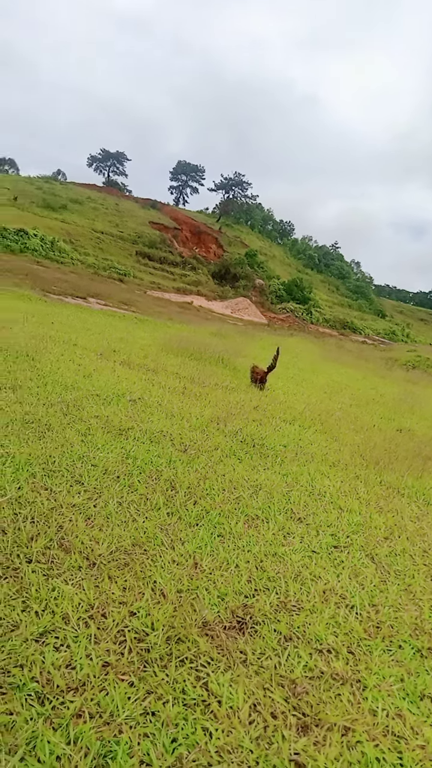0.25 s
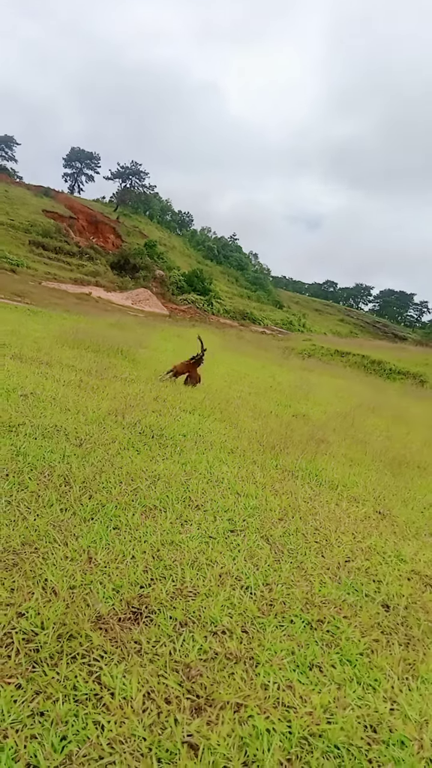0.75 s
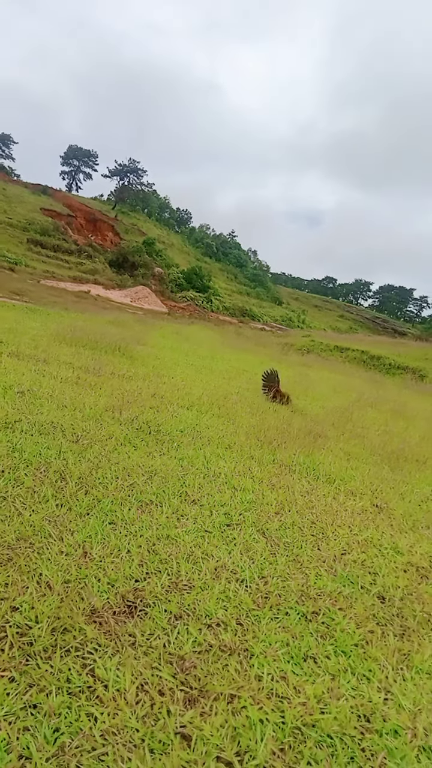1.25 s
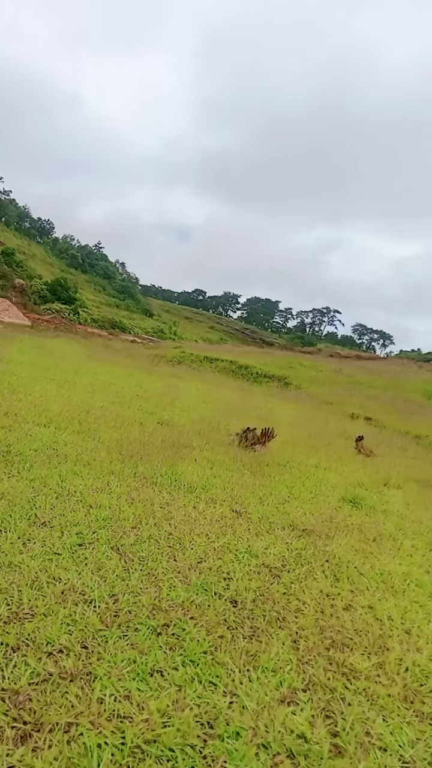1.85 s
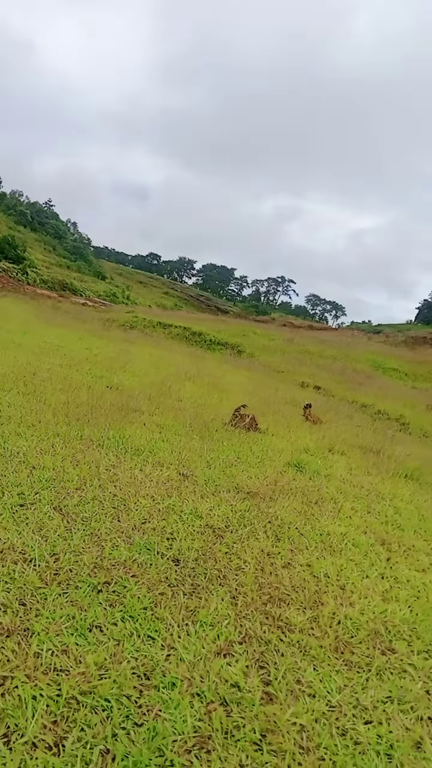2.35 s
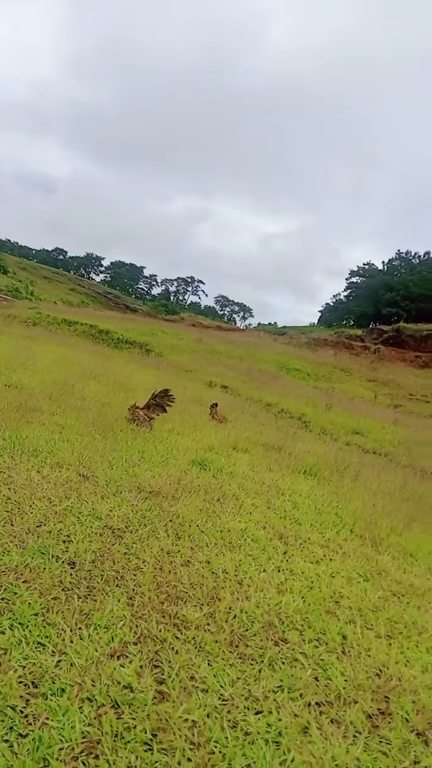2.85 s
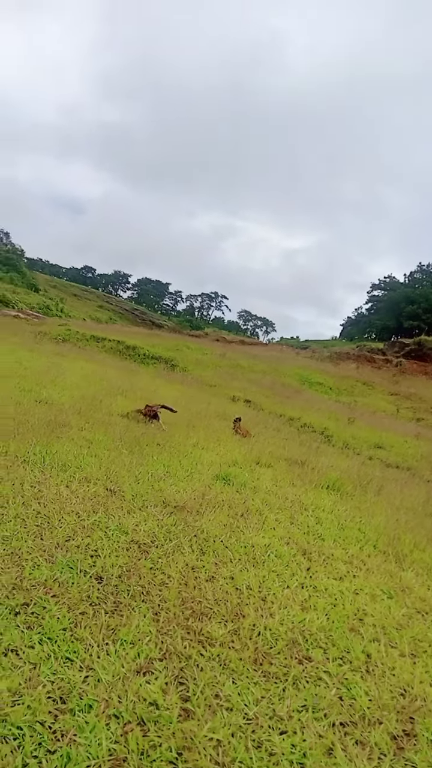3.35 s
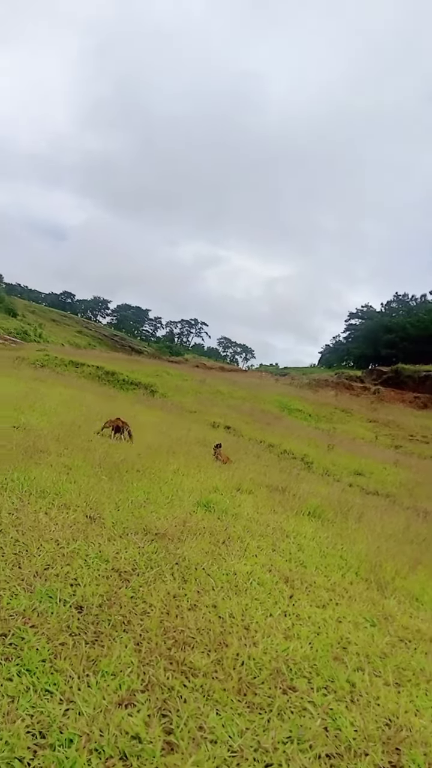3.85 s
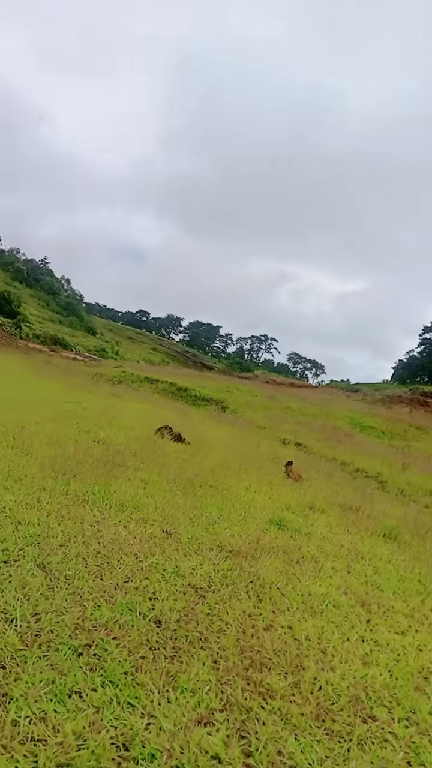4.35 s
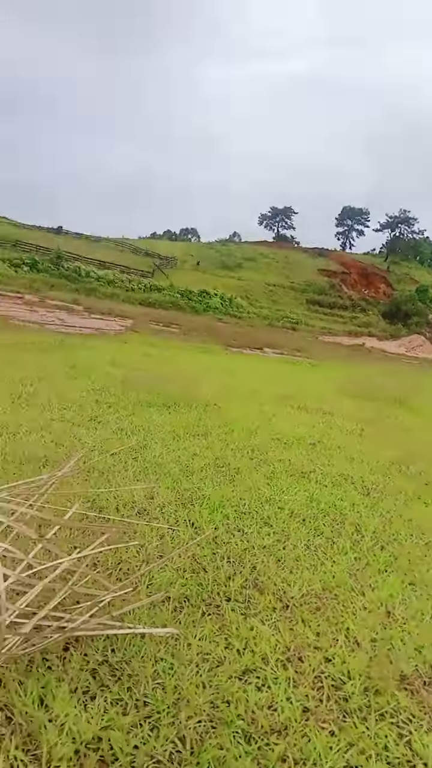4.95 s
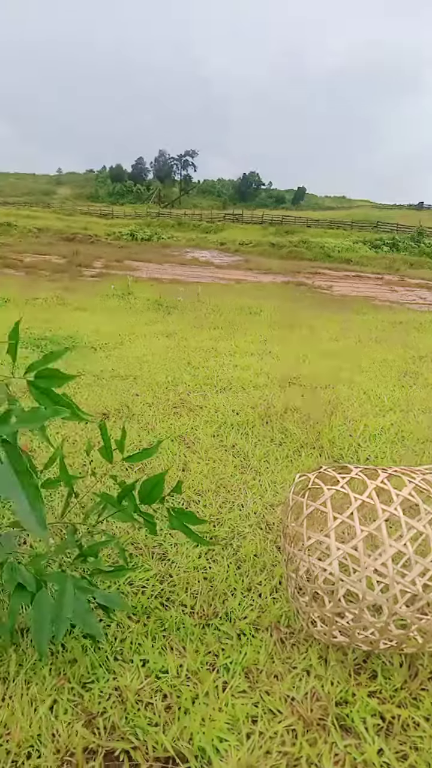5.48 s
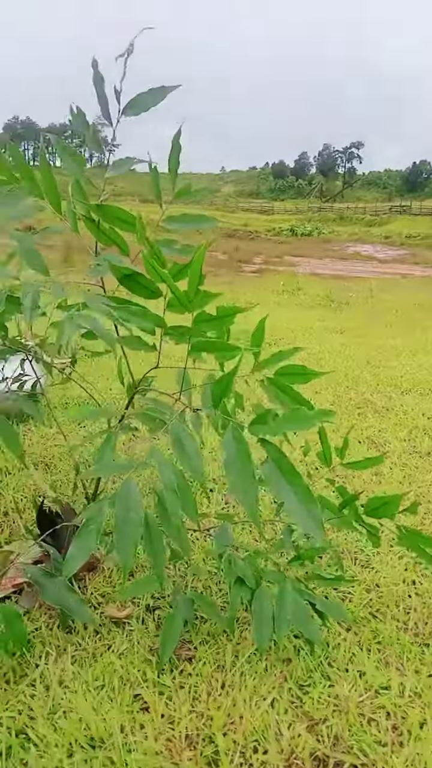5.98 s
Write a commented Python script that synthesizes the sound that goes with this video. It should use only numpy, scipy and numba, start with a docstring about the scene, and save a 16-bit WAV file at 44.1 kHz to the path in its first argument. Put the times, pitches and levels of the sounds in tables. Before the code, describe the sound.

Outdoors on an open grassy slope, low gusts thump a handheld phone's microphone as a hen gives hoarse rasps and thin squeals. Short clucks follow amid finger ticks and faint grass crackle. From about three seconds the squawks grow loud, harsh rasps flipping into clear nasal notes. The hen falls silent near five and a half seconds, leaving soft breeze, case ticks, rustling and a brief creak.

```python
"""Gusts thump the hand-held phone as a hen, fleeing over open grass, opens with hoarse rasps and thin squeals.
Short rasps follow while the grip starts to tick and rustle and dry grass crackles; hillsides echo faintly. From
about 3 s the squawks grow, each rasp flipping to clear notes: uneven slaps of the syrinx ring the windpipe,
throat, beak and palate, and a steady beat makes the notes from stacked harmonics. After 5.5 s the hen is
silent; ticks, rustles, low thuds of the hand and a last creak of the case stay over the breeze."""
import sys
import numpy as np
from scipy import signal
from scipy.io import wavfile
from scipy.ndimage import uniform_filter1d
from numba import njit

SR = 44100
rng = np.random.default_rng(int(sys.argv[2]) if len(sys.argv) > 2 else 0)


def persist_wave(psi):
    """Save psi, clipped to +-1, as 16-bit WAV."""
    counts = np.round(np.clip(psi, -1, 1) * 32767).astype(np.int16)
    wavfile.write(sys.argv[1], SR, np.atleast_2d(counts).T)


N = 274162

# Levels are those ahead of the phone's own shaping in record().
# Breeze in grass and trees, spectrum shape: f/Hz, relative level per Hz/dB
AIR_SPECTRUM = [(140, -31), (230, 1.5), (370, -17.5), (441, -7.5), (536, -10.5), (585, -17), (662, 2),
                (832, -19), (1840, -15.5), (2960, -16), (15500, -60.5)]
AIR_DB = -54.5  # overall

# Low thumps: peak t/s, level/dB, rise/s, fall/s, flutter relative to the thump/dB; # wind gusts, except the
# last three, which are low thuds of the hand on the case
THUMPS = [(0.02, -24.0, 0.026, 0.024, -19), (0.1, -13, 0.061, 0.18, -9.5),
          (0.18, -13.0, 0.028, 0.043, -12.5), (0.24, -18.5, 0.033, 0.16, -16),
          (0.58, -26, 0.02, 0.04, -26.0), (0.68, -26.5, 0.13, 0.14, -11.5), (0.789, -22, 0.025, 0.07, -5.5),
          (0.85, -15, 0.067, 0.073, -11.5), (1.18, -29.5, 0.18, 0.093, -18), (1.42, -36, 0.36, 0.026, -14),
          (1.75, -27, 0.121, 0.29, -10.5), (1.89, -16.5, 0.079, 0.1, -12.5), (2.04, -23.0, 0.22, 0.12, -21),
          (2.32, -27, 0.047, 0.11, -11.5), (2.57, -30.0, 0.35, 0.29, -14), (2.75, -30, 0.087, 0.082, -13.5),
          (3.55, -44, 0.603, 0.95, -4), (3.94, -32.5, 0.22, 0.13, -8.5), (4.159, -26.5, 0.031, 0.065, -7.5),
          (4.44, -33.5, 0.14, 0.07, 0), (4.81, -43, 0.62, 0.7, -7.5), (5.75, -40.5, 0.036, 0.115, -4.0),
          (5.96, -38.5, 0.022, 0.039, -4), (6.069, -44.5, 0.035, 0.22, 1.0)]
THUMP_SPAN_DB = 21.5  # a thump climbs and drops this far in its rise and fall times
# Wind between the gusts: t/s, level/dB
BREEZE = [(0, -48.5), (2.9, -49), (3.3, -52.5), (4.0, -51), (5.2, -53.5), (5.7, -55.5), (6.22, -66)]
BREEZE_FLUTTER_DB = -2.5  # relative to the breeze
# Thump resonances: f/Hz (sounded 1 % lower by modes), width/Hz, relative level/dB
BUFFET_MODES = [(82, 70, 4.5), (125.8, 108, 2.5), (200.7, 117, -9)]

# Dry grass snapping: t/s, level/dB
CRACKLE_LEVEL = [(0, -65), (1.9, -59.5), (2.3, -56.5), (3.1, -50), (3.7, -63.5), (6.22, -69)]
CRACKLE_RATE = 56  # snaps per s, before clustering

# Finger ticks on the case: t/s, click level/dB, thud relative to click/dB, click f/Hz
TICKS = [(0.613, -29, 5, 703), (1.196, -39.5, 15.5, 1094), (1.514, -22, -4.5, 1170),
         (1.907, -31.5, 17.5, 769), (2.602, -28, -2, 985), (2.733, -34, 12.5, 1300),
         (3.09, -17.5, -14, 710), (3.492, -23.5, 2, 703), (3.496, -29.5, 2, 1090), (3.551, -26, -1, 1670),
         (3.909, -18, -6, 840), (4.008, -19, 4, 866), (5.711, -44, -14, 980), (5.737, -19, 0.5, 1710),
         (5.745, -18, -23, 714.3), (5.789, -27, -9, 2200), (5.956, -23, 4.5, 1680), (6.085, -20, -23, 1010),
         (6.101, -24, -27, 1060), (6.142, -16.5, -33, 1940), (6.168, -25.5, -16, 1400)]
# Cloth rustles: t/s, level/dB (before a fixed scale in rustle), centre f/Hz, length/s
RUSTLES = [(2.3, -33.5, 6560, 0.046), (3.043, -27, 3280, 0.021), (3.565, -34, 3530, 0.023),
           (3.579, -34.5, 3510, 0.024), (4.1348, -28.5, 3030, 0.024), (6.102, -33, 2530, 0.045),
           (6.12, -38.5, 2500, 0.051)]
# Creak of the case: start t/s, end t/s
CREAK_SPAN = (6.067, 6.125)
CREAK_RATE, CREAK_DB, CREAK_FADE_S = 182, -16, 0.052  # slips per s, level at the start, decay time

# Hoarse stretches of the calls: start t/s, loudest t/s, end t/s, swell/dB, fade/dB (both before the shares below),
#   levels at the loudest: windpipe/dB, throat/dB, beak/dB, palate/dB, hiss/dB;
#   windpipe f/Hz, throat f at start/Hz, throat f at end/Hz, beak f/Hz, palate f at the loudest/Hz,
#   blur (scale of the core widths), throb depth/dB
RASPS = [(0.055, 0.068, 0.125, 16, 5.5, -29, -41, -30.5, -26.5, -33, 973, 1870.0, 1000.0, 2800.0, 3680, 1.2, 2.3),
         (0.12, 0.27, 0.36, -1, 21, -30, -47, -39.5, -40, -44.5, 1066, 1830, 1440, 2350.0, 3400, 0.64, 1.5),
         (0.697, 0.707, 0.76, 4.0, 17, -39, -40, -32.5, -41.0, -49.5, 853, 1810, 2040, 2500.0, 3600, 1.1, 4.7),
         (0.77, 0.877, 0.915, 36, 23, -28.5, -33, -36.0, -37, -62, 896, 1140.0, 1240, 2640, 3840, 1.47, 1.0),
         (0.91, 0.944, 0.957, 19, 23.0, -31, -46, -45.5, -47, -60.5, 863.0, 1100.0, 1300.0, 2600.0, 3740.0, 1.5, 0.6),
         (1.08, 1.12, 1.149, 44, 22, -28, -38.5, -38, -43.5, -62, 862, 1100.0, 1300.0, 2670, 4100, 1.14, 2.2),
         (1.292, 1.4, 1.4324, 15.0, 26, -32.5, -28.5, -38.0, -35.0, -45, 1000.0, 1900, 1720, 2630.0, 4020, 1.4, 3),
         (1.553, 1.575, 1.6, 8, 7, -37, -35.5, -41.0, -43, -54, 978, 1450.0, 1440.0, 2830.0, 3500, 1.3, 2.1),
         (1.597, 1.632, 1.67, 14, 30, -29, -29, -32.5, -37.5, -44, 1112.0, 1500.0, 1630.0, 2820.0, 3530, 1.23, 0.6),
         (1.784, 1.833, 1.88, -3.0, 21, -33.5, -38.5, -43.0, -47, -56.5, 955, 1440, 1430, 2640.0, 3650.0, 1.23, 1.8),
         (2.03, 2.218, 2.25, 5.5, 27, -36.5, -34.5, -49.0, -49, -56.0, 830.0, 1400.0, 1550, 2490.0, 3330, 0.73, 1.3),
         (2.36, 2.473, 2.52, 8, 4.0, -37.5, -30, -36, -47, -57.0, 927, 1420, 1560.0, 2690.0, 3470, 0.89, 0.78),
         (2.495, 2.555, 2.6, 16, 44.5, -25, -22.5, -22.5, -36.5, -47.0, 930.0, 1795, 1480, 2690.0, 3480, 0.85, 0.7),
         (2.745, 2.935, 2.998, 7.5, 35, -37, -29.0, -44, -44.5, -51, 851, 1460.0, 1590, 2670.0, 3370.0, 1.24, 1.4),
         (3.14, 3.204, 3.235, 21.0, 2.5, -33.5, -36.5, -31.5, -43.5, -59, 815.0, 1450.0, 1860, 2520.0, 3900, 1.03, 0.3),
         (3.395, 3.398, 3.42, 2.0, 44, -28, -24.0, -29, -42, -46, 854, 1580.0, 1660.0, 2000.0, 3300.0, 1.1, 1.1),
         (3.62, 3.827, 3.835, 29.5, -4, -28, -20, -21, -24.0, -36, 867.5, 1780, 1874, 2736.0, 3430, 1, 1.4),
         (3.872, 3.876, 3.9, 2.5, 23, -32.0, -26, -46, -43, -47.5, 870.0, 1700, 1400.0, 2440.0, 3400.0, 0.83, 1.2),
         (4.245, 4.49, 4.505, 23, -1.5, -26.0, -16.5, -15, -22.5, -33, 886, 1960, 1780, 2597.0, 3180, 1.24, 1.5),
         (4.552, 4.556, 4.585, 3.5, 21, -32.5, -30.5, -36, -49, -69, 910.0, 1200.0, 1830.0, 1900.0, 3330.0, 0.65, 3.0),
         (4.74, 4.78, 4.85, 21, 9, -24, -16.5, -15.0, -29, -39.5, 1060, 1550, 1980.0, 2680.0, 3900.0, 1.47, 0.99),
         (4.887, 4.94, 4.958, 1.0, 1.5, -22.5, -16.0, -14.0, -25.5, -40.5, 1102, 1840, 1790, 2670.0, 3860, 1.2, 0.6),
         (5.032, 5.036, 5.055, 3.0, 26, -27.5, -28.5, -29, -48.0, -53.5, 1200.0, 1930.0, 1750.0, 2510.0, 3330.0, 1.6, 2.7),
         (5.218, 5.238, 5.243, 12, 3, -28, -23.5, -16.5, -16, -32.0, 988.0, 1780, 1730, 2800.0, 3280.0, 0.77, 1.1),
         (5.276, 5.288, 5.388, 0, 6.5, -27, -19.5, -15.5, -15, -31.5, 936, 1660, 1724, 2700.0, 3250, 0.51, 1.1),
         (5.488, 5.493, 5.514, 1.0, 27, -28, -17, -27, -19, -35.5, 903, 1620.0, 1520, 2860.0, 3340, 1.76, 1.1)]
# Share of the swell each tone takes: windpipe, throat, beak, palate, hiss [ratio]
SWELL_SHARE = (0.38, 0.73, 1.04, 0.98, 1.14)
# Share of the fade each tone takes: windpipe, throat, beak, palate, hiss [ratio]
FADE_SHARE = (0.76, .75, 1.12, 1.24, 1.25)
SWELL_BEND, FADE_BEND = 2.57, 1.2  # above 1: effort climbs fast and levels off, holds and then drops
GAPE_RISE = 0.0046  # palate and hiss tones climb by this share per dB of swell as the beak opens
THROB_HZ = 55
# Breath hiss resonances: f/Hz at full gape, width/Hz, relative level/dB
HISS_MODES = [(4650, 700, 2), (6700, 800, -7.5), (6910, 170, -9), (8340, 1700, -20), (11400, 1500, -21),
              (13500, 2300, -22)]

# Clear notes, one curve each: t/s, pitch f/Hz, level/dB
NOTES = [
    [(3.23, 438, -30.5), (3.29, 448, -27.5), (3.345, 468, -26.5), (3.364, 487, -23.5)],
    [(3.36, 696, -22.5), (3.38, 658, -15.5), (3.4, 586, -25.5)],
    [(3.83, 677, -12), (3.846, 667, -9.5), (3.864, 630, -14), (3.877, 592, -29)],
    [(4.5, 710, -10.5), (4.522, 692.5, -7.5), (4.542, 655, -15), (4.557, 628, -23)],
    [(4.8, 309, -18), (4.845, 326.3, -12), (4.88, 341.5, -10.5), (4.892, 344, -9)],
    [(4.953, 742, -9.5), (4.975, 718, -12.5), (4.997, 725, -12.5), (5.017, 685, -15), (5.036, 610, -26.5)],
    [(5.236, 605, -11), (5.25, 640, -10.5), (5.266, 669, -9), (5.28, 698, -10)],
    [(5.382, 723, -26.5), (5.395, 745, -13), (5.408, 756, -14), (5.419, 813, -16.5)],
    [(5.414, 795, -17), (5.43, 823, -14), (5.443, 847, -9.5), (5.452, 765, -16), (5.459, 860, -14)],
    [(5.455, 892, -9), (5.463, 1015, -8), (5.476, 1027, -9.5), (5.486, 1037, -11.5), (5.496, 862, -17)],
]
# Harmonics 1, 2, 3 .. of each note, in the order of the notes: relative level/dB
VOWELS = [
    [-18, -0.2, -27, -10, -10.5, -6.5, -21, -13.5, -18, -30, -27],
    [-13, -12, -2, 1, -36, -20.5, -19, -30],
    [-17, -5, 1, -8.5, -10.5, -31, -20.5, -23.5],
    [-17.5, -2.5, 0, -0.5, -19.5, -27, -16, -40],
    [-50, -26, -12.5, -27.5, 3, -14.5, 5.5, -3.5, -0.5, -4.5, -33.5, -0.5, -14, -14, -13, -17, -22],
    [-12.5, -3, -0.7, -1.5, -21, -20, -25, -35],
    [-15, -21.5, -15, -4.5, 0, -30, -23, -45],
    [-24, -5.5, -27, -6, -19, -20, -45],
    [-13, -6, -1, -0.5, -22, -20.5, -27.5],
    [-11.5, 0, 6, -18.5, -15.5, -20.5],
]
# Harmonics above those listed: f/Hz, relative level/dB
UPPER = [(4000, -32.5), (5500, -46), (7000, -30.5), (9000, -53.5), (12000, -45), (15500, -56.5)]
# Turbulence in each note, in the order of the notes: level relative to the tone/dB
BREATH_DB = [-39, -7.5, -27.5, -30, -16, -24, -22, -38.5, -33.5, -15.5]

# Thin wavering squeals in the first calls, one curve each: t/s, pitch f/Hz, level/dB
SQUEALS = [
    [(.115, 960, -44), (.17, 1060, -28.5), (.215, 1170, -30), (.25, 1215, -25), (.29, 1130, -35),
     (.335, 880, -34)],
    [(.735, 1040, -42), (.78, 1270, -37), (.815, 1360, -32.5), (.85, 1260, -33), (.89, 980, -30)],
]
# Harmonics 1, 2 of the squeals: relative level/dB
SQUEAL_DB = [-2.5, -20]

# Hillside echoes: delay t/s, level/dB
HILLS = [(.115, -48), (.197, -45), (.27, -62.5)]
HILL_HZ = 2640  # centre of the echoed band
TOP_HZ = 15750  # highest frequency kept


def undb(db):
    """Decibels to gain."""
    return 10 ** (np.asarray(db) / 20)


def unit(x):
    """Scaled to rms 1."""
    return x / np.sqrt(np.mean(x ** 2))


@njit
def svf(x, hz, width):
    """State-variable band-pass whose centre may move, gain 1 at the centre."""
    y, b, l = np.empty(len(x)), 0., 0.
    for i in range(len(x)):
        g, k = np.tan(np.pi * hz[i] / SR), width / hz[i]
        v = (b + g * (x[i] - l)) / (1 + g * (g + k))
        b, l, y[i] = 2 * v - b, l + 2 * g * v, k * v
    return y


def band(x, hz, width):
    """A steep resonance: the band-pass applied twice."""
    hz = hz + np.zeros(len(x))
    return svf(svf(x, hz, 1. * width), hz, 1. * width)


def modes(x, table, shift=0.99):
    """Sum of resonances, each first brought to equal strength; shift scales their pitch."""
    return unit(sum(undb(db) * unit(band(x, hz * shift, width)) for hz, width, db in table))


def walk(rate, size):
    """Random levels held 1 / rate s and smoothed twice into slopes; rms 1."""
    k = int(SR / rate)
    steps = np.repeat(rng.standard_normal(size // k + 2), k)
    return unit(uniform_filter1d(uniform_filter1d(steps, k), k)[:size])


def stretch(table, edge_s=0.0044):
    """Sample slice, columns on that slice and a soft on-off gate for one curve table."""
    s, *columns = np.transpose(table)
    span = slice(int(s[0] * SR), int(s[-1] * SR))
    t = np.arange(span.start, span.stop) / SR
    gate = np.clip(np.minimum(t - s[0], s[-1] - t) / edge_s, 0, 1)
    return span, [np.interp(t, s, c) for c in columns], gate


def air():
    """Breeze in the grass and far trees: noise bands that swell together and flicker alone."""
    out, swell = 0, walk(1.7, N)
    hz, db = np.transpose(AIR_SPECTRUM)
    for centre in 250 * 2 ** np.arange(0, 6.1, .5):  # half an octave apart
        flicker_db = 1.51 * walk(26, N)
        gain_db = np.interp(np.log(centre), np.log(hz), db) + 0.64 * swell + flicker_db
        out = out + undb(gain_db) * band(rng.standard_normal(N), centre, centre / 2)
    return unit(out) * undb(AIR_DB)


def wind():
    """Eddies thump on the microphone port in gusts; a lighter flutter rides above them. The last three thumps
    are the hand knocking the case, sounded through the same resonances."""
    t = np.arange(N) / SR
    buffet_gain = undb(np.interp(t, *np.transpose(BREEZE)))
    flutter_gain = buffet_gain * undb(BREEZE_FLUTTER_DB)
    for s, db, rise_s, fall_s, flutter_db in THUMPS:
        thump = undb(db - THUMP_SPAN_DB * np.maximum((s - t) / rise_s, (t - s) / fall_s))
        buffet_gain = np.hypot(buffet_gain, thump)
        flutter_gain = np.hypot(flutter_gain, thump * undb(flutter_db))
    eddies = rng.standard_normal(N) * undb(2.7 * walk(25.01, N))
    buffet = unit(band(modes(eddies, BUFFET_MODES), 94.5, 390))
    flutter = unit(band(band(eddies, 317, 340), 317, 340))
    return buffet * buffet_gain + flutter * flutter_gain


def crackle():
    """Dry grass snaps faintly under wings and feet; a broad hiss near 7 kHz shares its level curve."""
    chance, size_draw = rng.random((N, 2)).T
    clustering = undb(8. * walk(6, N))
    strength = undb(-3.5 * np.log(1 - size_draw))  # mostly small snaps, a few large
    snaps = (chance < CRACKLE_RATE / SR * clustering) * strength
    tails = signal.lfilter([1], [1, -np.exp(-1 / (0.00093 * SR))], snaps)  # each dies away in about 1 ms
    snaps = band(tails * rng.standard_normal(N), 8800, 10000)
    hiss = undb(-17.5 + 5. * walk(5.1, N)) * unit(band(rng.standard_normal(N), 6760, 1300))
    s, db = np.transpose(CRACKLE_LEVEL)
    return (snaps + hiss) * undb(np.interp(np.arange(N) / SR, s, db))


def ring(hz, decay_s, rise_s=0.00016):
    """One damped ring after a soft contact."""
    t = np.arange(int(.04 * SR)) / SR
    return np.sin(2 * np.pi * hz * t) * np.exp(-t / decay_s) * (1 - np.exp(-(t / rise_s) ** 2))


def tick(thud_db, hz):
    """A finger meets the case: a short click tone, a noisy crack and a low thud."""
    crack = 0.09 * rng.standard_normal(int(.04 * SR)) * ring(2400, 0.0014)
    return ring(hz, 0.00054) + crack + undb(thud_db) * ring(179, 0.0027)


def rustle(hz, length_s):
    """Cloth rubs: grainy noise in a broad band, swelling and fading once."""
    size = int(length_s * SR)
    grains = rng.standard_normal(size) * undb(4 * walk(500, size))
    return 0.17 * unit(band(grains, hz, 4000)) * np.hanning(size)


def creak(out):
    """The case sticks and slips: near-regular damped rings, fading, added into out."""
    start, end = CREAK_SPAN
    rings = ring(1030, 0.00092) + 0.56 * ring(278, 0.002) + 0.32 * ring(1460, 0.0013)
    slip = band(rings, 890, 3560)
    for s in np.arange(start, end, 1 / CREAK_RATE):
        late_s = 0.00031 * rng.standard_normal()
        gain = undb(CREAK_DB + 1.6 * rng.standard_normal()) * np.exp((start - s) / CREAK_FADE_S)
        out[int((s + late_s) * SR):][:len(slip)] += gain * slip


def grip():
    """Ticks, rustles and the creak reach the microphone through the case, which dulls their sharpest edges."""
    out = np.zeros(N + SR)
    for s, db, thud_db, hz in TICKS:
        sound = tick(thud_db, hz)
        out[int(s * SR):][:len(sound)] += undb(db) * sound
    for s, db, hz, length_s in RUSTLES:
        sound = rustle(hz, length_s)
        out[int(s * SR):][:len(sound)] += undb(db) * sound
    creak(out)
    return signal.sosfilt(signal.butter(2, 7000, fs=SR, output="sos"), out[:N])


def squeal(table):
    """A thin tone of two harmonics that trembles in pitch and strength."""
    span, (hz, db), gate = stretch(table, edge_s=0.0038)
    size = len(gate)
    phase = 2 * np.pi * np.cumsum(hz * (1 + 0.018 * walk(115, size))) / SR
    tone = sum(undb(over_db) * np.sin(k * phase) for k, over_db in enumerate(SQUEAL_DB, 1))
    return span, unit(tone) * undb(db + 3.3 * walk(54.2, size)) * gate


def rasp(row, jitter=0.11, scatter_db=3.5, breath=1.0):
    """The syrinx slaps unevenly near the windpipe tone; windpipe, throat, beak and palate ring with it."""
    start, loudest, end, swell_db, fade_db = row[:5]
    span, (before, after), gate = stretch([(start, 1, 0), (loudest, 0, 0), (end, 0, 1)])
    pipe_db, throat_db, beak_db, palate_db, hiss_db = (
        db - up * swell_db * before ** SWELL_BEND - down * fade_db * after ** FADE_BEND
        for db, up, down in zip(row[5:10], SWELL_SHARE, FADE_SHARE))
    pipe_hz, throat_from_hz, throat_to_hz, beak_hz, palate_hz, blur, throb_db = row[10:]
    gape = 1 - GAPE_RISE * swell_db * before
    size = len(gate)

    beat = np.floor(np.cumsum(pipe_hz * (1 + jitter * walk(700, size)) / SR)).astype(int)
    slaps = np.diff(beat, prepend=0) * undb(scatter_db * rng.standard_normal(size))
    source = unit(slaps) + breath * rng.standard_normal(size)
    source = source * undb(throb_db * np.sin(2 * np.pi * THROB_HZ * np.arange(size) / SR))

    sway = 1 + 0.023 * walk(30.1, size)  # the neck bobs as the hen runs
    throat_hz = np.linspace(throat_from_hz, throat_to_hz, size) * sway
    # windpipe and throat have a sharp core on a broad shoulder; the chest hums under the windpipe
    chest = undb(-15) * unit(band(source, 0.68 * pipe_hz, 260))
    pipe_core = unit(band(source, pipe_hz * sway, 190 * blur))
    pipe_shoulder = undb(-4.5) * unit(band(band(source, 1.25 * pipe_hz, 780), 1.25 * pipe_hz, 830))
    pipe = unit(chest + pipe_core + pipe_shoulder)
    throat_core = unit(band(source, throat_hz, 260 * blur))
    throat = unit(throat_core + undb(-9.5) * unit(band(source, throat_hz, 1100)))
    beak = unit(band(source, beak_hz * sway, 450 * blur))
    palate = unit(band(source, palate_hz * gape, 800 * blur))
    hiss = modes(source, HISS_MODES, gape)
    voice = undb(pipe_db) * pipe - undb(throat_db) * throat  # the throat answers in opposite phase
    voice = voice + undb(beak_db) * beak + undb(palate_db) * palate + undb(hiss_db) * hiss
    return span, voice * gate


def note(table, vowel, breath_db):
    """The syrinx locks into a steady beat: a stack of harmonics, each a little unsteady, with some breath."""
    span, (hz, db), gate = stretch(table, edge_s=0.0017)
    size = len(gate)
    hz = uniform_filter1d(hz, int(0.0067 * SR), mode="nearest")  # muscles round every turn of the pitch
    phase = 2 * np.pi * np.cumsum(hz * (1 + 0.002 * walk(197, size))) / SR
    upper_hz, upper_db = np.transpose(UPPER)
    tone = 0
    for k in range(1, int(TOP_HZ / hz.max())):
        if k <= len(vowel):
            gain_db = vowel[k - 1]
        else:
            gain_db = np.interp(np.log(k * hz), np.log(upper_hz), upper_db)
        shake = min(1 + (k * hz.mean() / 4000) ** 2, 4.)  # high harmonics break up more
        gain = undb(gain_db + shake * walk(90, size))
        wobble = 0.089 * shake * walk(250, size)
        tone = tone + gain * np.cos(k * phase - 1.2 * k ** 2 + wobble)
    tone = unit(tone)
    breath = unit(tone * band(rng.standard_normal(size), 270, 500))  # turbulence shakes the tone's strength
    return span, (tone + undb(breath_db) * breath) * undb(db) * gate


def echo(voice):
    """Hillsides return delayed, faint copies that keep only the middle tones."""
    out = np.zeros(N)
    far = band(voice, HILL_HZ, 1300)
    for delay_s, db in HILLS:
        lag = int(delay_s * SR)
        out[lag:] += undb(db) * far[:-lag]
    return out


def hen():
    """All calls: squeals, rasps and clear notes laid on one timeline, with their echoes."""
    voice = np.zeros(N)
    parts = [squeal(table) for table in SQUEALS]
    parts += [rasp(row) for row in RASPS]
    parts += [note(*call) for call in zip(NOTES, VOWELS, BREATH_DB)]
    for span, sound in parts:
        voice[span] += sound
    return voice + echo(voice)


def scene():
    """One microphone feeds both channels."""
    return np.tile(air() + wind() + crackle() + grip() + hen(), (2, 1))


def record(dry):
    """The phone drops the deepest bass, rounds the loudest peaks and cuts the top."""
    bass_cut = signal.sosfilt(signal.butter(3, 55, "high", fs=SR, output="sos"), dry)
    rounded = np.tanh(0.85 * bass_cut) / 0.82
    return signal.sosfilt(signal.ellip(8, .2, 70, TOP_HZ, fs=SR, output="sos"), rounded)


dry = scene()
out = record(dry)
persist_wave(out)
```